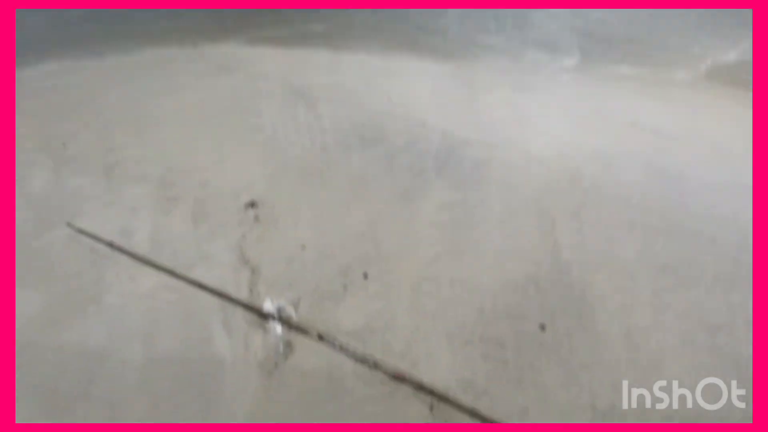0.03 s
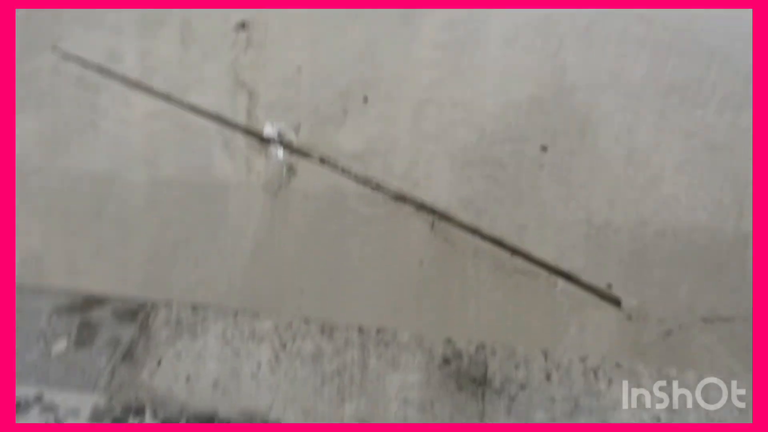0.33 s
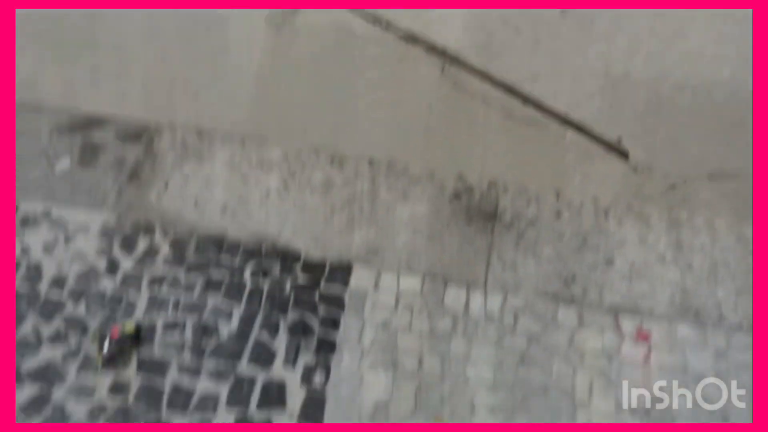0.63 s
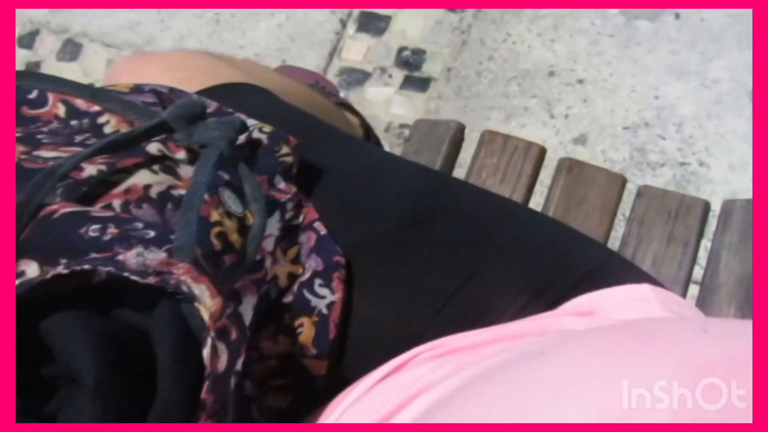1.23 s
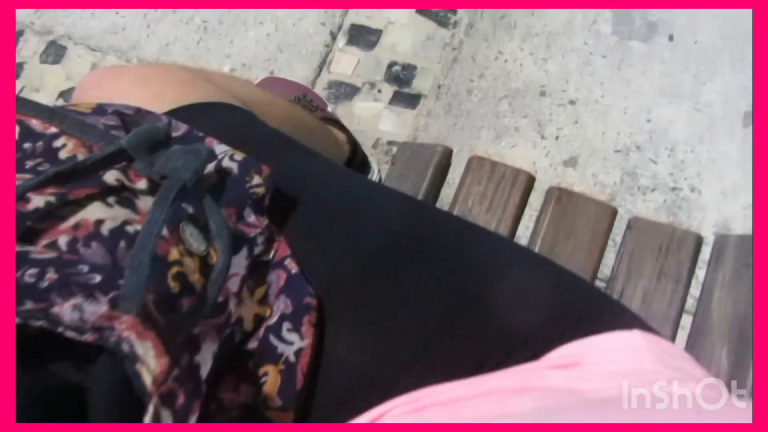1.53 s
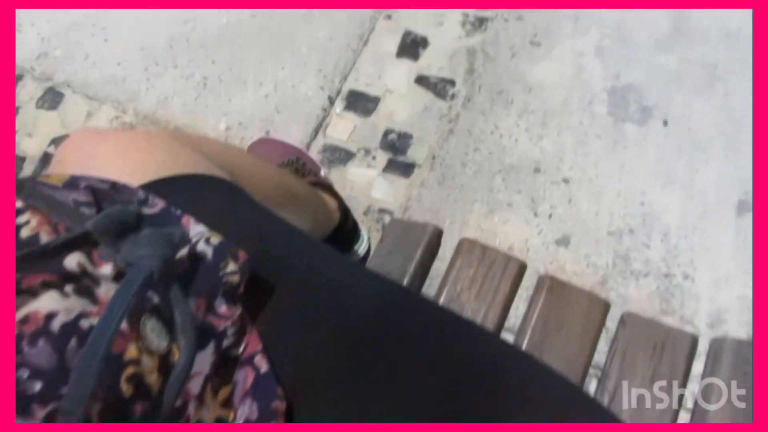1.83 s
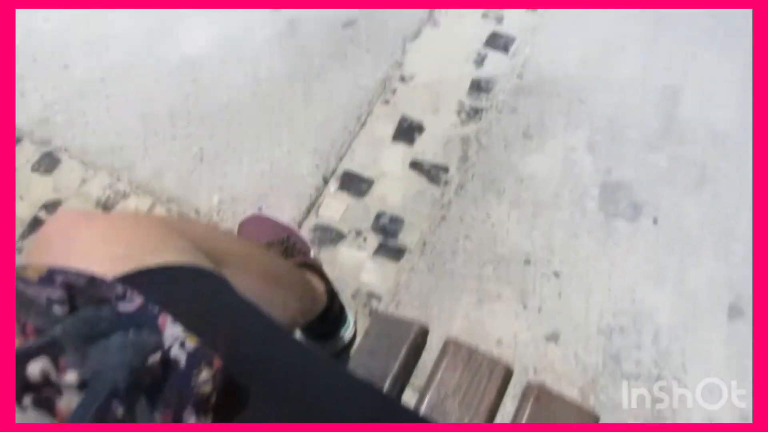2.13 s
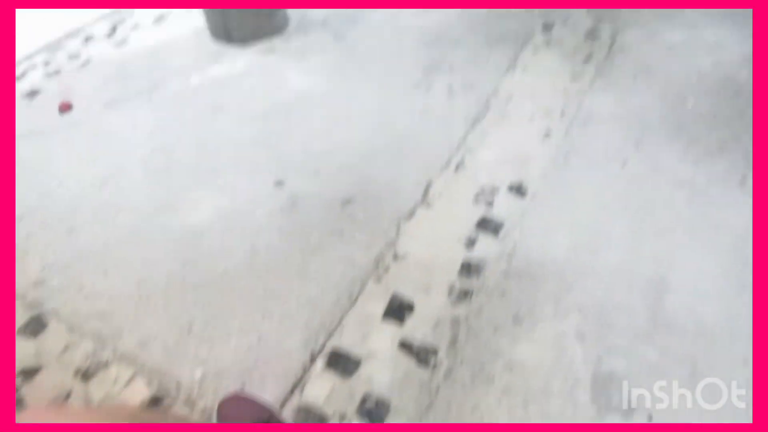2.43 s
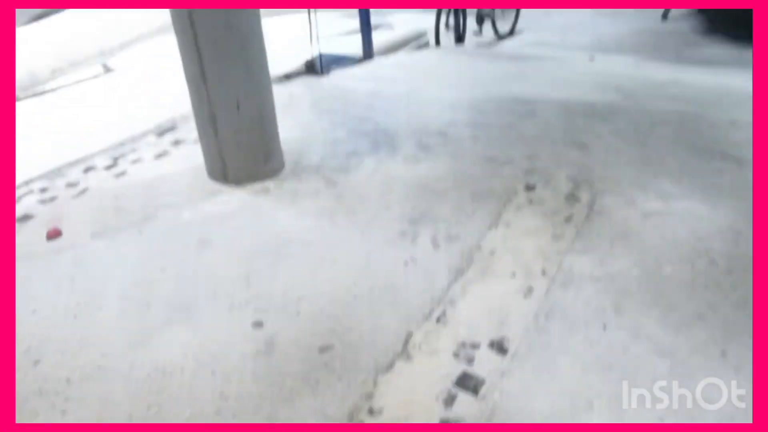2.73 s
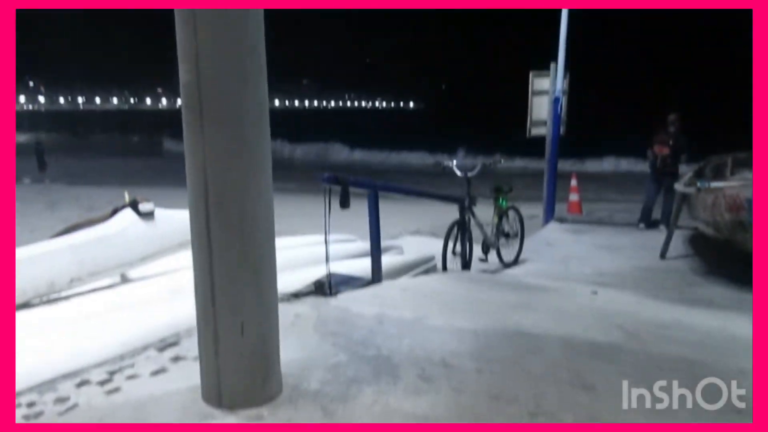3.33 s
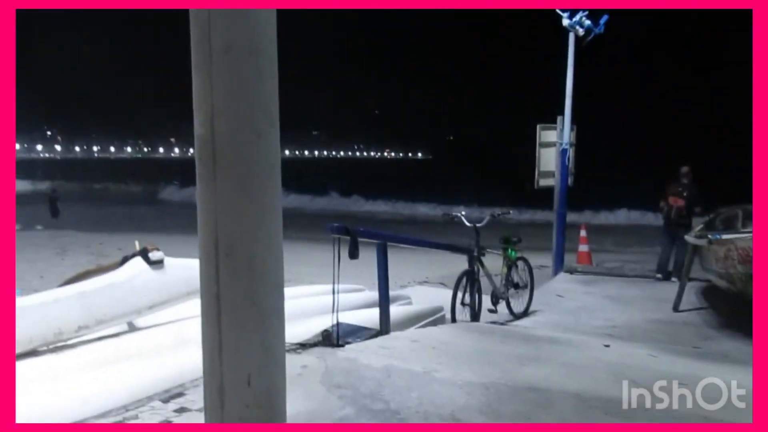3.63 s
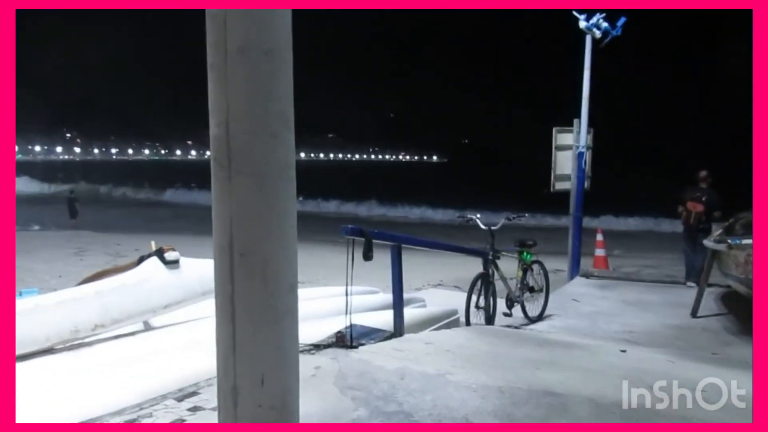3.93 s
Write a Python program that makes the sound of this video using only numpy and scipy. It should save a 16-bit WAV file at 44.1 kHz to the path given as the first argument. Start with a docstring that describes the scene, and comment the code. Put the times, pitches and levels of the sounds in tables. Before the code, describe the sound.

Surf rumbles, thuds and washes up the sand, fizzing with foam, as gusts thump a hand-held microphone. A short, abrupt silence interrupts early on, and the waves come back louder and brighter.

```python
"""Wind buffets and pops on a hand-held microphone over the low roar of surf on a beach at night.
Breakers roar and thud, water washes up the sand and foam hisses with tiny bursting bubbles, each
swelling in its own time. After a second comes a short silence, then the sea returns louder.
The microphone's two ports hollow out the surf near 700 Hz, and its colour shifts as they turn."""
import sys
import numpy as np
from scipy import signal
from scipy.fft import rfft, irfft
from scipy.io import wavfile
from scipy.ndimage import uniform_filter1d

SR = 44100
rng = np.random.default_rng(int(sys.argv[2]) if len(sys.argv) > 2 else 0)


def to_wav(s):
    """Save 16-bit WAV."""
    ch = np.atleast_2d(s).T  # columns
    pcm = np.round(np.clip(ch, -1, 1) * 32767)  # PCM
    wavfile.write(sys.argv[1], SR, pcm.astype(np.int16))


N = 176400

# Faders for the deep rumble, the breakers and the wash up the sand: time_s, level_db
RUMBLE_SWELL = [(0, -35.5), (.45, -34), (.75, -39), (.92, -35.5), (1.4, -32), (2.3, -34), (2.6, -32.5),
                (3.1, -33), (3.55, -32), (4, -34.5)]
FIRST_ROAR = [(0, -34), (.22, -30), (.31, -35.5), (.4, -32), (.6, -30.5), (.79, -29), (.83, -21.5),
              (.895, -26.5), (.94, -21.5), (.99, -27.5)]
SECOND_ROAR = [(1.23, -28.5), (1.55, -29.5), (1.75, -29.5), (1.98, -28), (2.16, -28.5), (2.32, -24.5),
               (2.42, -26.5), (2.599, -24), (2.79, -26), (2.84, -22.5), (3.12, -21), (3.22, -22),
               (3.4, -23.5), (3.52, -22.5), (3.73, -23), (3.82, -21), (3.92, -25.5)]
FIRST_WASH = [(0.02, -41.5), (0.2, -41), (0.4, -42.5), (0.6, -38.5), (0.8, -36.5), (0.97, -37.5)]
SECOND_WASH = [(1.23, -31.5), (1.3, -32), (1.45, -36), (1.55, -31.5), (1.66, -35.5), (1.74, -35),
               (1.872, -37), (1.94, -35.5), (1.985, -32), (2.13, -35.4), (2.24, -33.5), (2.35, -31.5),
               (2.5, -34.5), (2.73, -36), (2.88, -31.5), (3.05, -33), (3.4, -34), (3.58, -33.5),
               (3.72, -34), (3.83, -32), (3.97, -35)]
# Faders for the foam: time_s, hiss_db, fizz_db
FIRST_FOAM = [(0.02, -51, -52.5), (0.14, -48.7, -51.4), (0.3, -49.5, -51), (0.5, -48.0, -49.9),
              (0.7, -46, -48), (0.97, -44.5, -47)]
SECOND_FOAM = [(1.23, -38.5, -41), (1.309, -38, -41.1), (1.55, -39, -42), (1.82, -41.5, -43),
               (1.97, -38.5, -38.5), (2.12, -39.5, -39.5), (2.34, -36, -36.5), (2.5, -38, -39.5),
               (2.73, -40, -40.5), (2.83, -35.5, -39.2), (2.91, -34.5, -38), (3.07, -39, -41.5),
               (3.4, -39, -42), (3.72, -41, -44.0), (3.9, -39.5, -43.5), (3.99, -40, -43)]
# Tone within each surf band, facing the ground, shielded by the body, in the open: freq_hz, gain_db
GROUND_EQ = [(25, -30.5), (43, -26), (80, -7.5), (200, 2), (310, -2.5), (443, -6.5), (560, -15.5),
             (627, -17), (695, -34.5), (760, -24), (840, -17.5), (1130, -18.5), (1320, -20.5),
             (1550, -22.5), (2000, -25.5), (2940, -32.5), (4500, -35), (6880, -34), (10000, -38.5),
             (14500, -47)]
SHIELDED_EQ = [(25, -26), (43, -13), (90, 1.5), (228, -1.5), (350, -4), (430, -12), (534, -11.5),
               (620, -23), (680, -30), (760, -14), (862, -9.5), (980, -13.5), (1190, -8), (1500, -12),
               (2150, -19.5), (2520, -17.5), (3180, -22.5), (6000, -24), (8740, -28), (12000, -34),
               (14500, -39)]
OPEN_EQ = [(25, -29), (43, -18), (134, -0.5), (200, 0.1), (285, 0.4), (468, -9), (549, -20.5), (627, -17),
           (685, -32), (796, -15.5), (886, -14.5), (1200, -19), (1470, -19), (2060, -26.5), (2500, -24.5),
           (3180, -29.5), (5000, -32), (7000, -30), (8510, -32), (11000, -37.5), (14500, -47)]
def sea():
    """Two passages of surf and bubbles: one facing the ground, one turning from shielded to open."""
    passages = []
    for eq_from, eq_to, roar, wash, foam in [(GROUND_EQ, GROUND_EQ, FIRST_ROAR, FIRST_WASH, FIRST_FOAM),
                                             (SHIELDED_EQ, OPEN_EQ, SECOND_ROAR, SECOND_WASH, SECOND_FOAM)]:
        hiss, fizz = fader(foam), fader(foam, column=2)
        swells = [fader(RUMBLE_SWELL), fader(roar), fader(wash), hiss, fizz]
        passages.append(surf(eq_from, eq_to, swells) + bubbles(hiss))
    return passages


# Surf bands, in the order rumble, roar, wash, hiss, fizz: top_hz, trim_db, patchiness_db, flutter_db
SURF_BANDS = [(110, 0, -0.2, 2), (683, 0.5, 1.04, .5), (2050, 0, 1.22, -0.8), (5280, -0.5, 1.5, 0.45),
              (16000, 0, 1.5, 0.2)]
# The microphone's turn: start_s, end_s
TURN = [1.8, 2.15]
def surf(eq_from, eq_to, swells, patch_s=.06, patch_hz=160, flutter_hz=22, size=1024):
    """Churning water: bands of patchy noise, each on its own swell, changing tone through the turn."""
    hop = size // 4
    hz, t = np.fft.rfftfreq(size, 1 / SR), np.arange(0, N + size, hop) / SR
    turned = np.interp(t, TURN, [0, 1])[:, None]
    colour = amp((1 - turned) * at_hz(eq_from, hz) + turned * at_hz(eq_to, hz))
    noise = port_noise(hz, len(t))
    patches = uniform_filter1d(rng.standard_normal(colour.shape), round(patch_s / t[1]), axis=0)
    patches = unit(uniform_filter1d(patches, round(patch_hz / hz[1]), axis=1))
    out, bottom_hz = np.zeros((2, N)), 0
    for (top_hz, trim_db, patch_db, flutter_db), swell in zip(SURF_BANDS, swells):
        band = colour * ((hz >= bottom_hz) & (hz < top_hz))
        spectra = noise * amp(patch_db * patches) * band / np.linalg.norm(band, axis=1, keepdims=True)
        layer = signal.istft(spectra.transpose(0, 2, 1), nperseg=size, noverlap=size - hop)[1][:, :N]
        layer = layer * amp(flutter_db * wander(flutter_hz))
        out += layer / layer.mean(0).std() * swell * amp(trim_db)
        bottom_hz = top_hz
    return out


# Dull knocks within the roar: centre_s, half_width_s, peak_db, pitch_hz
BREAKER_THUDS = [(0.844, .005, -9.5, 194), (0.941, 0.0172, -22.5, 73), (2.0665, 0.0097, -7.5, 148),
                 (3.577, 0.0067, -7.5, 114), (3.9602, 0.0028, -3, 213)]
def thuds(size=4096):
    """A few low cycles each, reaching the ports as the surf does: left first and louder."""
    out, t = np.zeros((2, N)), (np.arange(size) - size / 2) / SR
    for centre_s, half_width_s, peak_db, hz in BREAKER_THUDS:
        burst = amp(peak_db) * np.exp(2j * np.pi * hz * t - (t / half_width_s) ** 2)
        right = amp(-at_hz(PORT_BALANCE, hz)) * np.exp(-1j * at_hz(PORT_PHASE, hz))
        add(out, centre_s, np.outer([1, right], burst).real)
    return out


def bubbles(swell, pops_per_s=820, spread_db=2.5, trim_db=-8, pitches=20):
    """Tiny bubbles burst in the foam, each ringing for a few cycles."""
    out, t = np.zeros((2, N)), np.arange(256) / SR
    for hz in np.geomspace(1500, 11000, pitches):
        bursts = rng.random(N) < pops_per_s / pitches / SR
        strength = amp(spread_db * np.minimum(rng.exponential(1, N), 4))
        ring = np.sin(2 * np.pi * hz * t) * np.exp(-hz * t / 1.5)
        pops = np.convolve(bursts * strength, ring)[:N]
        out += np.outer([1, amp(-at_hz(PORT_BALANCE, hz))], pops)
    return amp(trim_db) * swell * unit(out)


# Fader for the gusts: time_s, level_db
WIND_GUSTS = [(0, -27), (.15, -22), (.26, -30), (.36, -40), (.8, -60), (1.25, -36.5), (1.42, -35),
              (1.68, -38), (1.8, -42), (2.4, -50), (3.15, -50), (3.32, -40), (3.47, -40), (3.72, -43),
              (3.85, -45), (4, -40)]
# Their boomy tone: freq_hz, gain_db
WIND_EQ = [(15, -11), (35, -23), (60, -12), (90, 5.5), (140, -7.5), (250, -12.5), (600, -33.5),
           (2000, -72.5)]
def wind(lump_db=-2.5, lump_hz=14, correlation=-.93):
    """Lumpy low buffeting, mostly opposed at the two ports."""
    colour = amp(at_hz(WIND_EQ, np.fft.rfftfreq(N, 1 / SR)))
    left, unrelated = irfft(rfft(rng.standard_normal((2, N))) * colour, N)
    right = correlation * left + np.sqrt(1 - correlation ** 2) * unrelated
    lumps = amp(lump_db * wander(lump_hz))
    return fader(WIND_GUSTS) * unit(np.array([left, right]) * lumps)


# Wind pops on the ports: centre_s, half_width_s, peak_db, right_minus_left_db
WIND_POPS = [(.015, 0.0014, -8, -0.5), (0.127, 0.0011, -17, -6), (0.151, 0.0018, -13, -0.5),
             (.2045, .002, -15, -4), (.2203, 0.0014, -4.5, -6), (0.2263, 0.0017, -9, 1.5),
             (0.2454, 0.0014, -7, 3), (0.255, 0.0012, -3.5, 2.5), (1.364, 0.0026, -13, 3),
             (1.59, .005, -22, 1), (1.7128, 0.0015, -14, -6)]
def eddies(size=4096):
    """Each eddy pushes one port and pulls the other: a pressure pulse with a rebound on either side."""
    out, t = np.zeros((2, N)), (np.arange(size) - size / 2) / SR
    for centre_s, half_width_s, peak_db, right_db in WIND_POPS:
        u = t / half_width_s
        pulse = amp(peak_db) * (1 - u ** 2) * np.exp(-u ** 2 / 2)
        add(out, centre_s, np.outer([1, -amp(right_db)], pulse))
    return out


# Phase between the ports: freq_hz, left_lead_rad
PORT_PHASE = [(20, .5), (43, .75), (86, 1.03), (130, 1.3), (236, 2), (300, 2.8), (390, 3.1), (500, 3.54),
              (600, 4.8), (780, 4.27), (1300, 5), (2000, 5.56), (2900, 6.25), (7000, 6.23), (10400, 5.3),
              (14000, 5.8)]
# Lean to the left: freq_hz, left_minus_right_db
PORT_BALANCE = [(60, 3), (92, 2.5), (140, 6.6), (210, 11), (330, 17.6), (500, 13.8), (770, 11.2),
                (1170, 6.9), (1790, 3.6), (2740, 2.4), (4190, 2.3), (6410, 6.8), (9810, 6.3), (15000, 8)]
# How alike the two sides sound: freq_hz, coherence
PORT_COHERENCE = [(40, 0.81), (100, 0.97), (280, 1), (560, 0.81), (850, 0.88), (1500, 0.98), (2100, 0.84),
                  (3200, 0.98), (6500, 0.83), (8500, 0.59), (11000, .35), (14500, .12)]
def port_noise(hz, frames):
    """Noise spectra at the two ports: partly alike, the left louder and leading in phase."""
    shape = (2, frames, len(hz))
    left, unrelated = rng.standard_normal(shape) + 1j * rng.standard_normal(shape)
    alike = np.clip(at_hz(PORT_COHERENCE, hz), 0, .995)
    lead, gain = at_hz(PORT_PHASE, hz), amp(-at_hz(PORT_BALANCE, hz))
    right = gain * np.exp(-1j * lead) * (alike * left + np.sqrt(1 - alike ** 2) * unrelated)
    mono_gain = np.sqrt(1 + gain ** 2 + 2 * gain * alike * np.cos(lead))
    return np.array([left, right]) / mono_gain


def amp(db):
    """Decibels to gain."""
    return 10 ** (np.asarray(db) / 20)


def unit(x):
    """Scales to rms 1."""
    return x / np.sqrt(np.mean(abs(x) ** 2) + 1e-20)


def at_hz(points, hz):
    """Reads a table on a log-frequency axis."""
    f, value = np.transpose(points)
    return np.interp(np.log(hz + 1), np.log(f + 1), value)


def fader(rows, column=1):
    """Gain at every sample from one dB column of a curve."""
    rows = np.array(rows)
    return amp(np.interp(np.arange(N) / SR, rows[:, 0], rows[:, column]))


def add(mix, centre_s, sound):
    """Mixes a stereo sound in around its centre."""
    start = round(centre_s * SR) - sound.shape[1] // 2
    sound = sound[:, max(-start, 0):]
    part = mix[:, max(start, 0):][:, :sound.shape[1]]
    part += sound[:, :part.shape[1]]


def wander(hz):
    """Slow random drift of rms 1, rolling off above hz."""
    f = np.fft.rfftfreq(N, 1 / SR)
    return unit(irfft(rfft(rng.standard_normal(N)) * f / (f + 4) / (1 + (f / hz) ** 2), N))


# When each passage sounds: start_s, end_s
PASSAGES = [(0, .995), (1.2085, 4)]
def scene(fade_s=.002):
    """Two passages of sea with wind over them, cut hard to silence in between."""
    low_end = wind() + eddies() + thuds()
    mix, t = np.zeros((2, N)), np.arange(N) / SR
    for water, (start_s, end_s) in zip(sea(), PASSAGES):
        gate = (t >= start_s) * np.clip((end_s - t) / fade_s, 0, 1)
        mix += (water + low_end) * gate
    return mix


def record(dry, cutoff_hz=14450):
    """A steep low-pass takes off the very top of the fizz."""
    lowpass = signal.firwin(301, cutoff_hz, window=("kaiser", 9), fs=SR)
    return signal.oaconvolve(dry, lowpass[None], "same")


dry = scene()
out = record(dry)
to_wav(out)
```